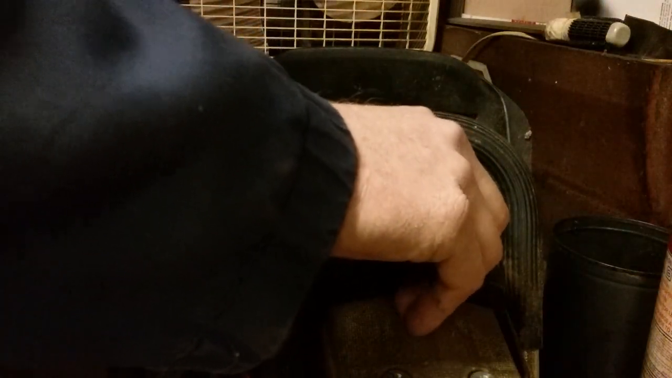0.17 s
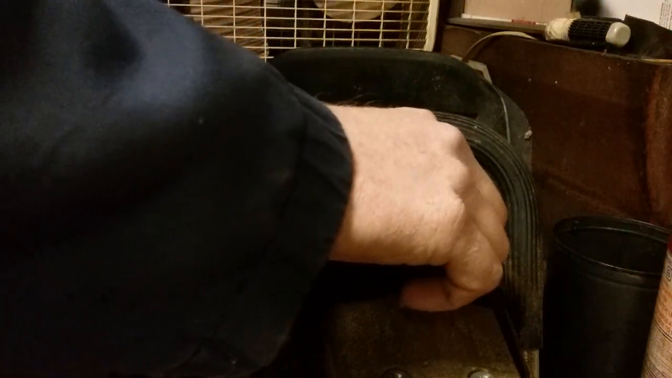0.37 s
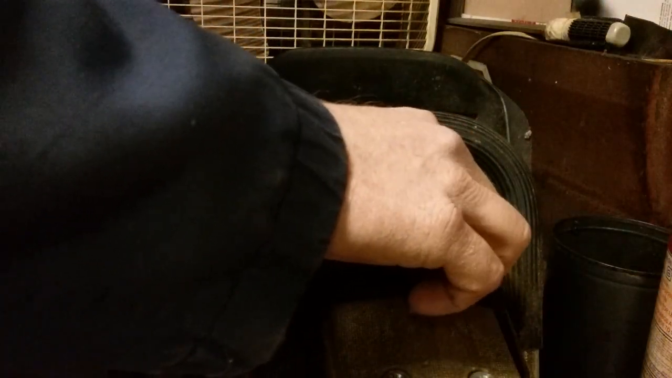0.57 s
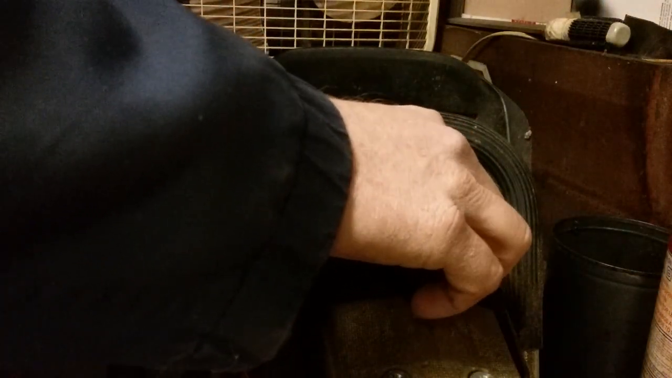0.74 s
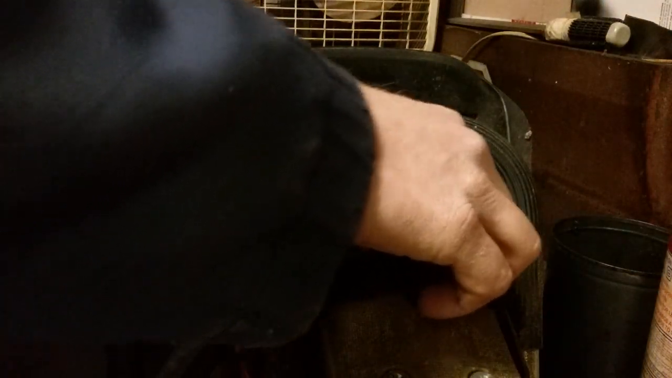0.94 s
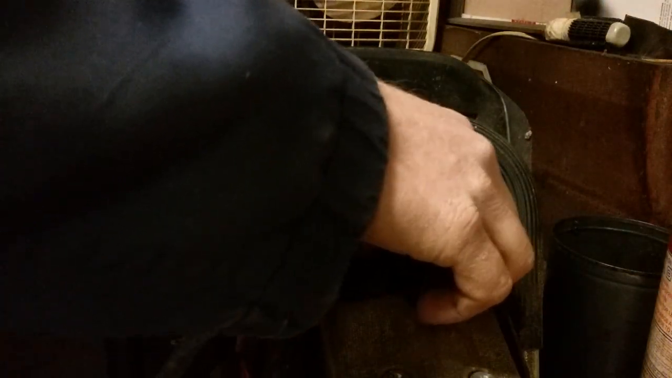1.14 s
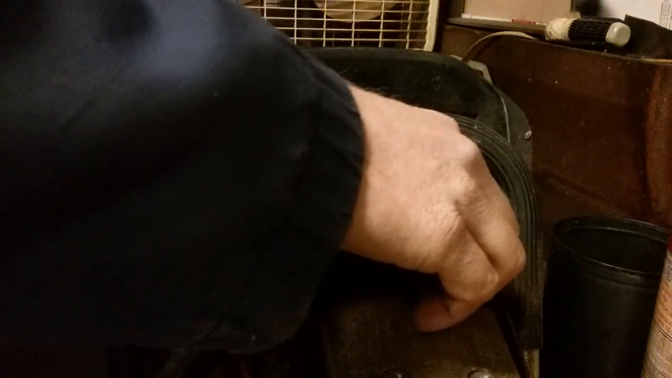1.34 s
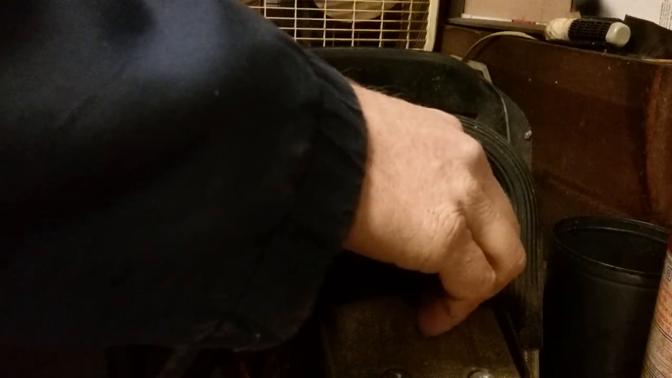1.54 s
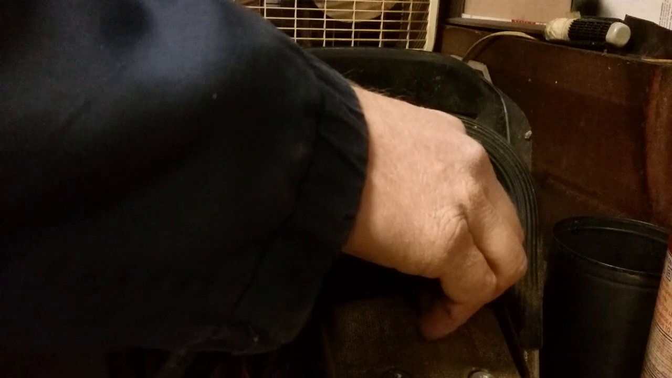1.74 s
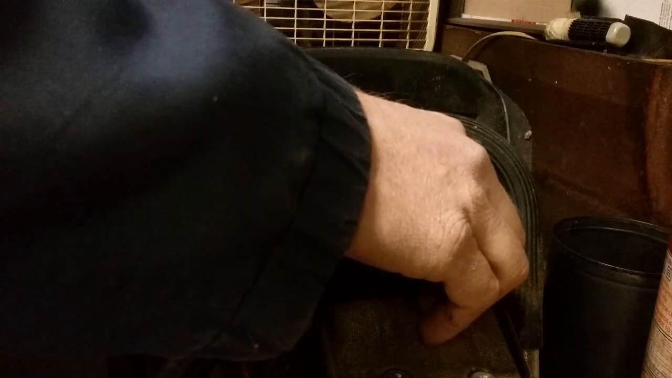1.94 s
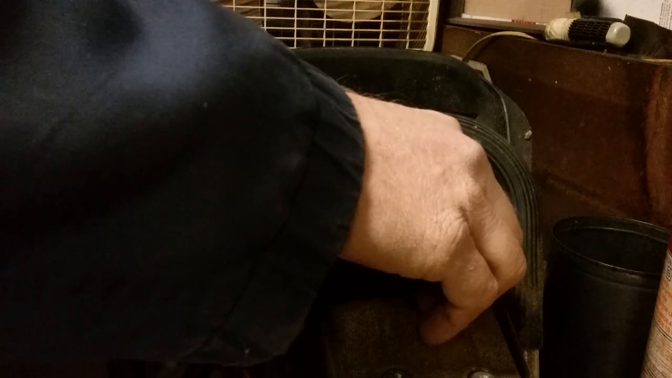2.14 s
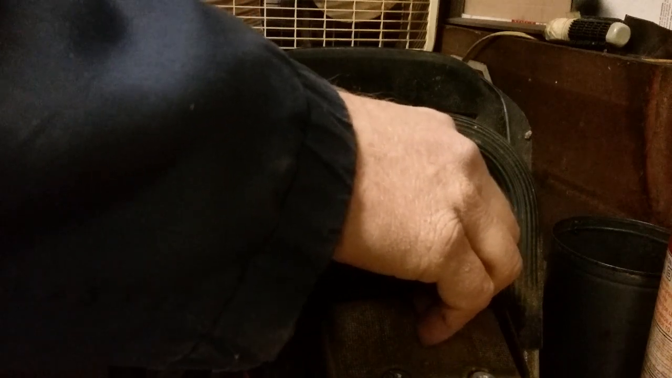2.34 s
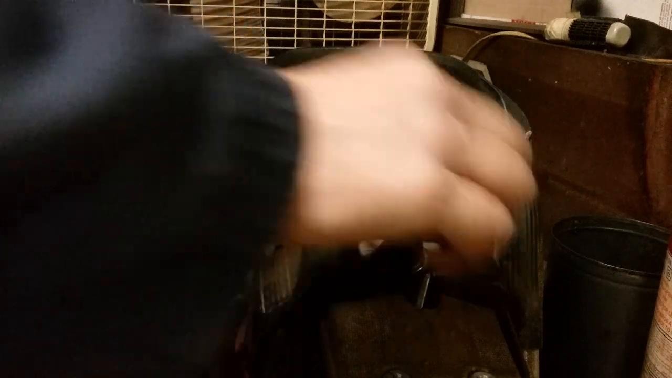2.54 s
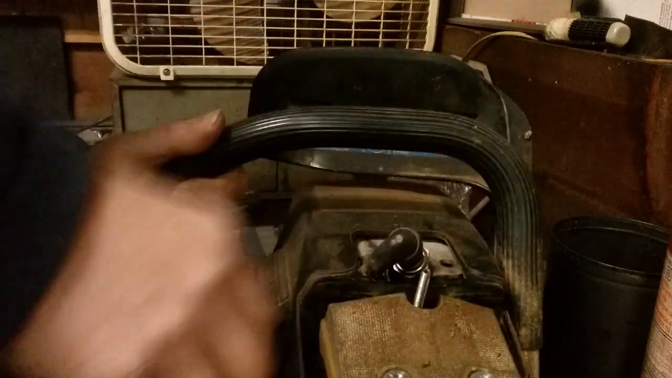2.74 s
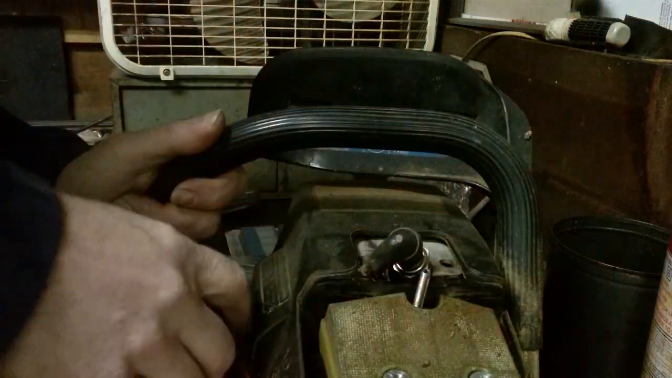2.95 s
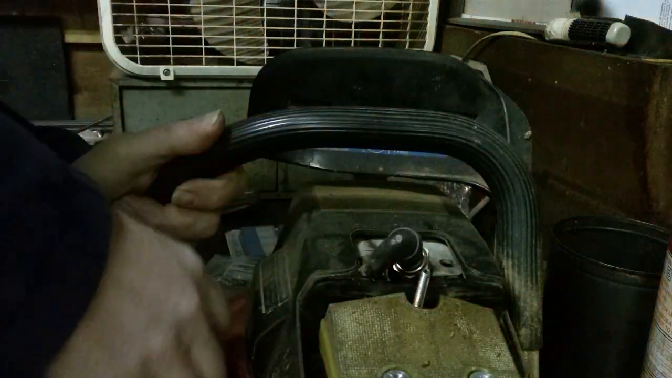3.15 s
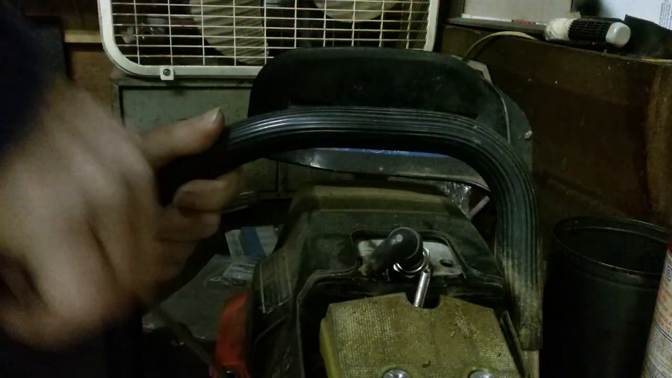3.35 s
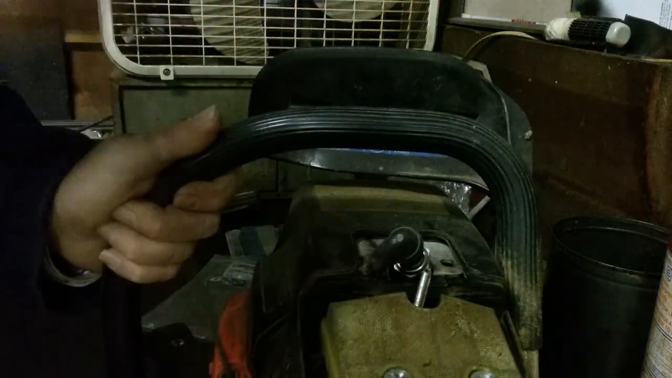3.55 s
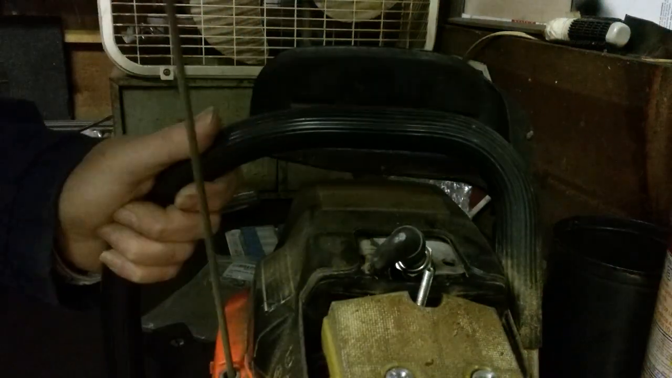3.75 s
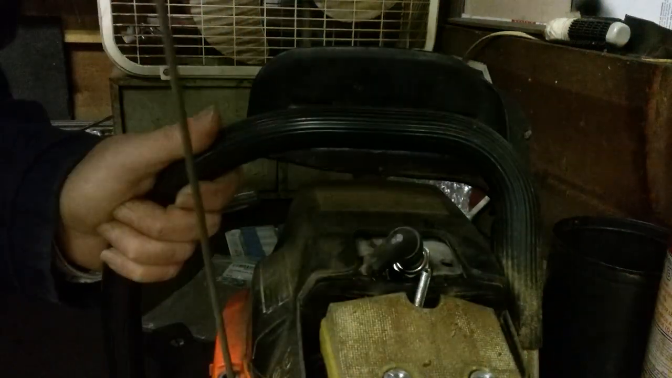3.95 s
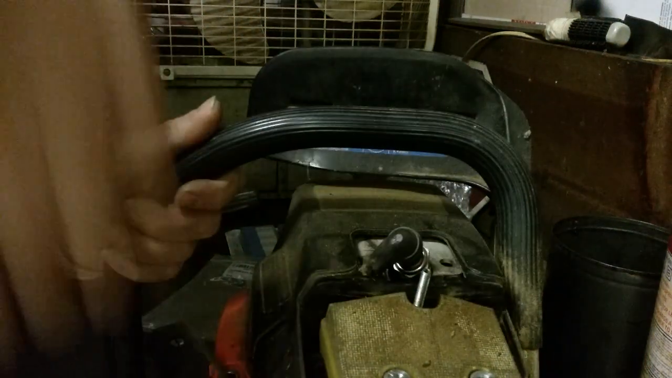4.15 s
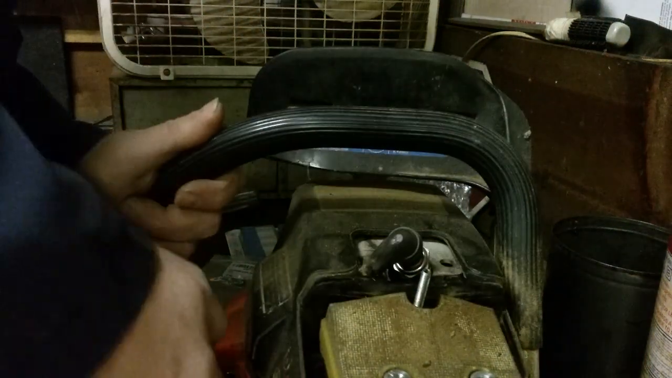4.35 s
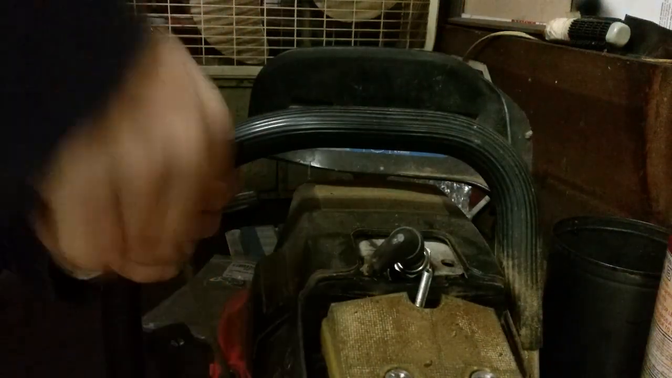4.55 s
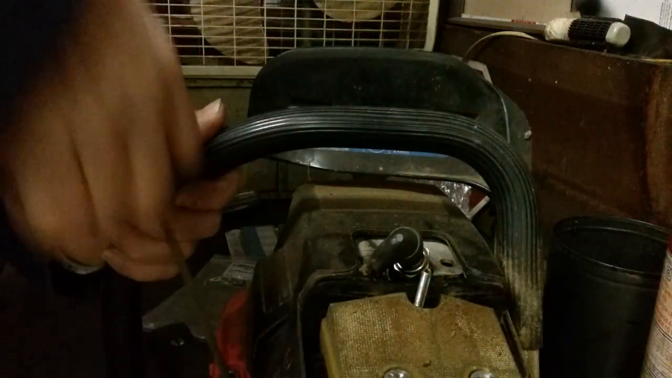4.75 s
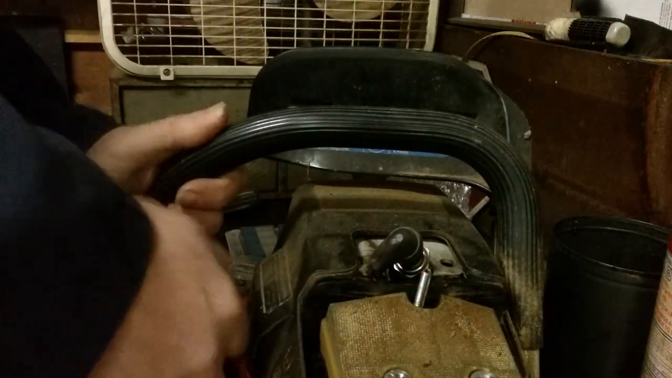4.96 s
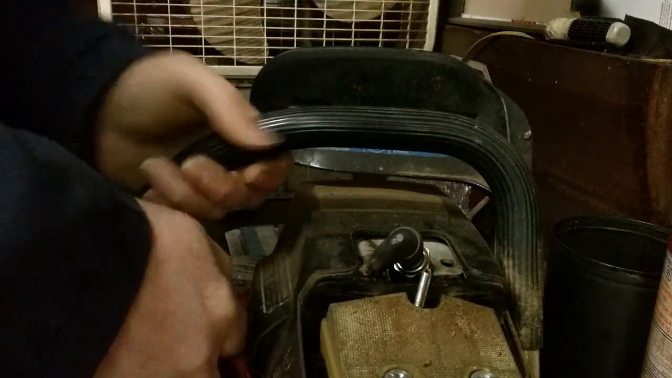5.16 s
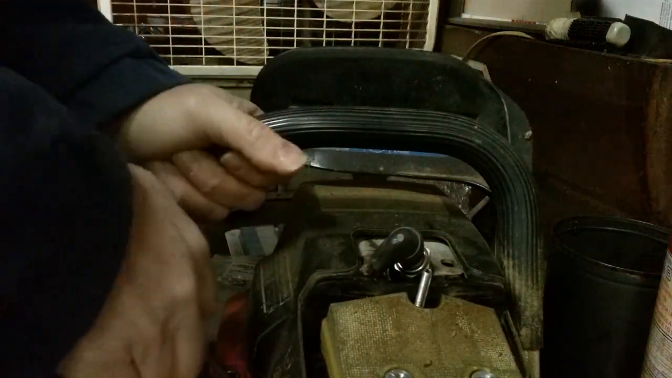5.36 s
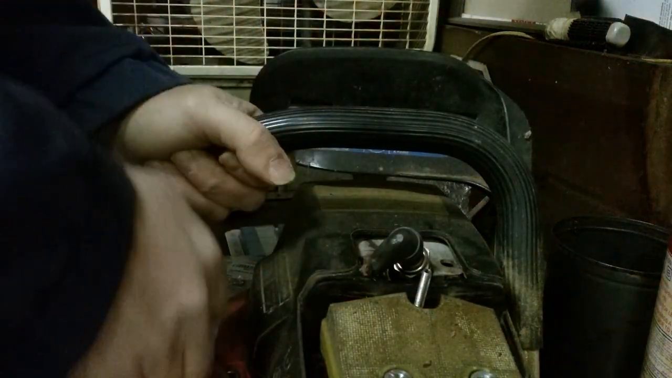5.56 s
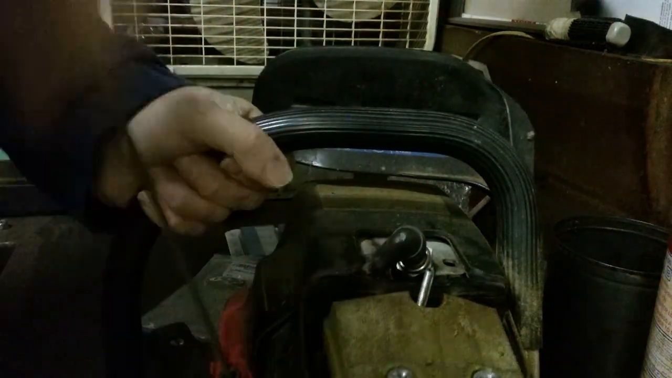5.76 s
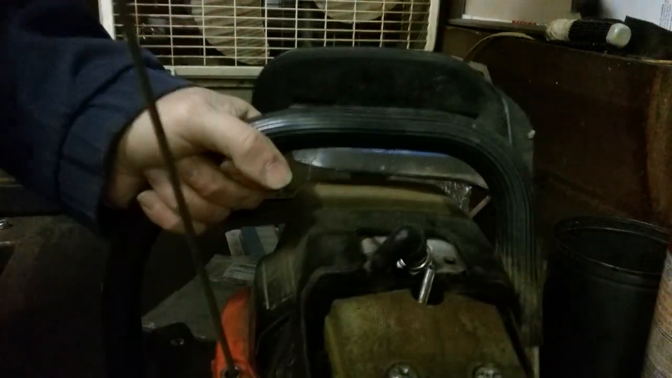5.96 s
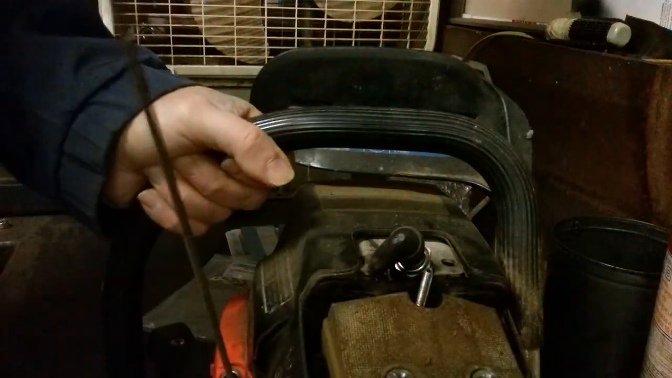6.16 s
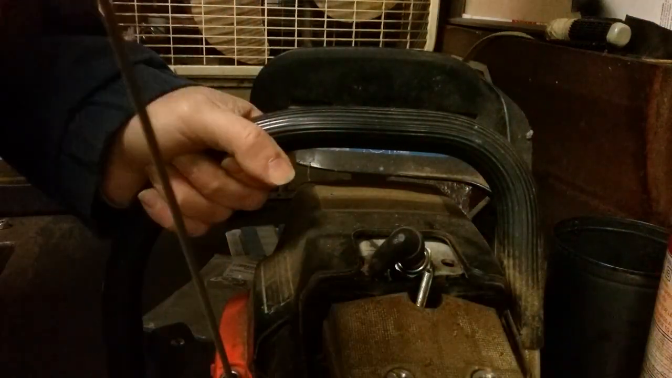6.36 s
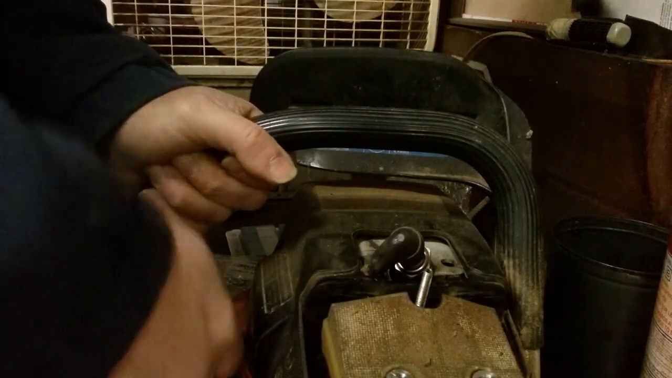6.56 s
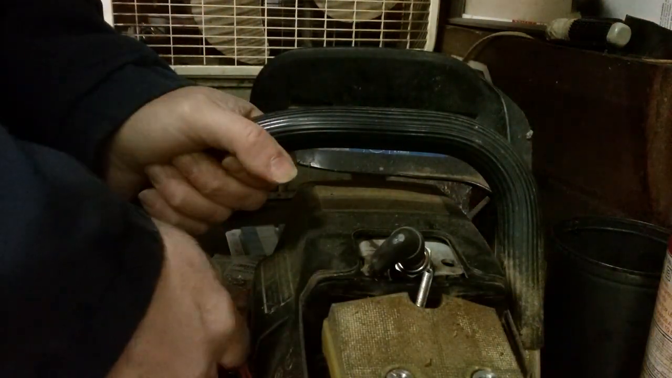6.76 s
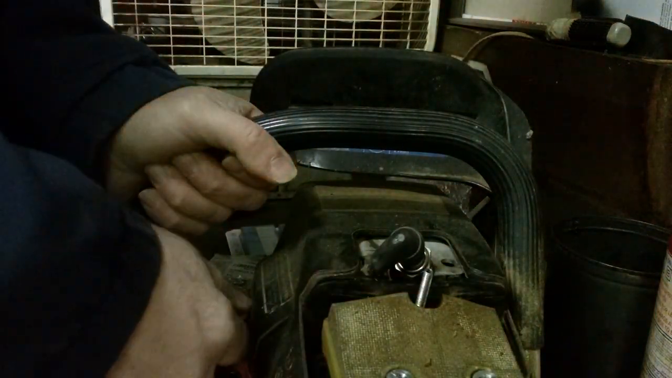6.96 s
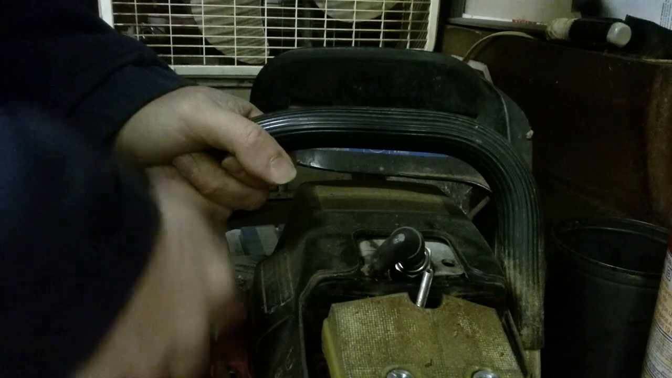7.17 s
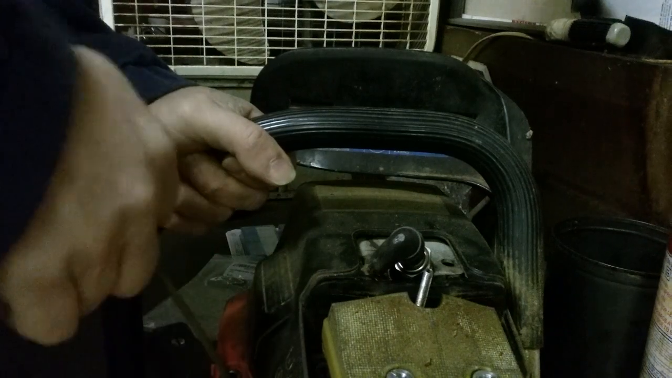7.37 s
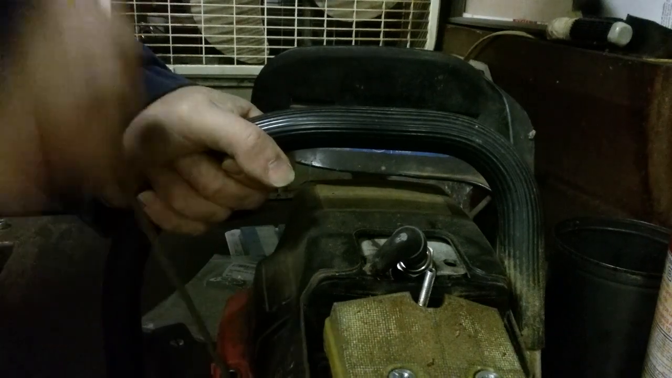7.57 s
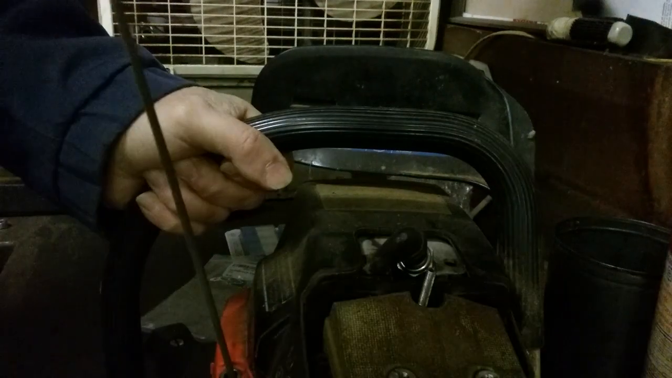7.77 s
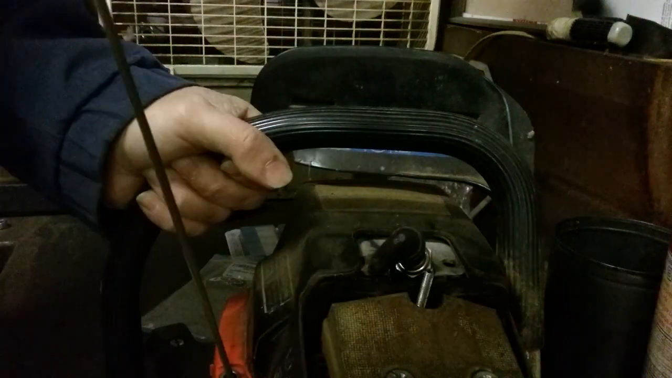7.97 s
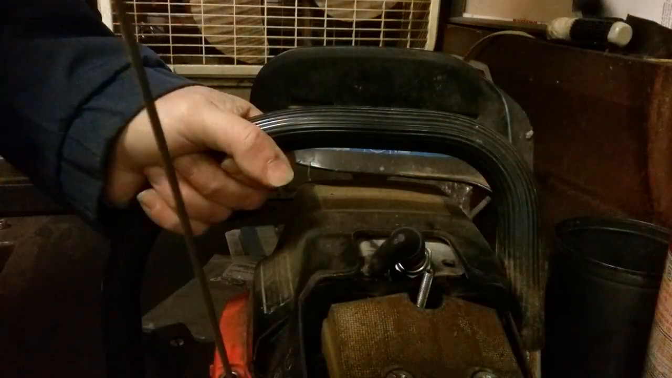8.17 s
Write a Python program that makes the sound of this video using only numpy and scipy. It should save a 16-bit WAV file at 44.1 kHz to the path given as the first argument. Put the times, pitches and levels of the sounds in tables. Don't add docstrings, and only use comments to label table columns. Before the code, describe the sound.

A chainsaw's starter rope is pulled three times in a small workshop, engine puffing and ratcheting without firing, spring rewinds clattering between knocks.

```python
import sys
import numpy as np
from scipy import signal
from scipy.fft import rfft, irfft, next_fast_len
from scipy.io import wavfile
from scipy.ndimage import uniform_filter1d

SR = 44100
rng = np.random.default_rng(int(sys.argv[2]) if len(sys.argv) > 2 else 0)


def inscribe(sig):
    pcm = np.round(np.clip(np.atleast_2d(sig).T, -1, 1) * 32767)
    wavfile.write(sys.argv[1], SR, pcm.astype(np.int16))


def elevation(decibels):
    levels = np.asarray(decibels, float)
    return 10 ** (levels / 20)


N = 362426
TIME = np.arange(N) / SR
SPREAD = 0.92

# (time [s], rasp level [dB])
PULLS = [
    [(3.6, -34.5), (3.63, -32), (3.756, -17), (3.85, -18.5), (3.92, -28), (4.0, -55), (4.04, -33)],
    [(5.77, -53), (5.795, -31), (5.848, -18), (6.05, -19), (6.13, -32), (6.162, -57), (6.21, -39)],
    [(7.62, -67), (7.64, -48), (7.742, -18.5), (7.87, -18.5), (7.994, -27.5), (8.04, -50), (8.1, -54)],
]
# (time [s], puff level [dB], click level [dB])
COMPRESSIONS = [(3.631, -8, -39), (3.771, -2.5, -34), (3.872, -4, -14.5), (5.815, -8.5, -20.5),
                (5.912, -4, -11), (5.976, -1.5, -8.5), (6.042, -0.5, -6), (6.144, -12, -18.5),
                (7.766, -2, -13.5), (7.835, -1.5, -6.5), (7.906, 0.5, -8), (8, -6.5, -10.5)]
# (time [s], peak level [dB], scrape length [s], strike on the starter cup [dB])
TURNS = [(4.048, -9.5, 0.02, -32.5), (4.090, -5.5, 0.018, -23.5), (4.127, -9.5, 0.024, -38),
         (4.167, -6.5, 0.019, -22.5), (4.211, -9.5, 0.026, -31), (4.24, -22.5, .011, -20),
         (4.264, -10, 0.027, -39), (4.307, -20.5, 0.026, -67), (6.215, -13, 0.019, -34),
         (6.245, -24.5, 0.007, -42), (6.269, -8, 0.017, -36), (6.309, -9.5, .014, -30.5),
         (6.346, -9.5, 0.024, -27.5), (6.382, -10.5, 0.024, -33.5), (6.421, -9.5, .029, -28),
         (6.473, -13, 0.024, -35.5), (6.506, -30, 0.022, -44), (6.535, -15, 0.014, -50),
         (6.555, -17.5, 0.043, -54), (8.163, -13, 0.0082, -55), (8.206, -6.5, .008, -48)]
# (time [s], peak level [dB], body [Hz], treble [dB], steel ring [dB])
KNOCKS = [(3.371, -46, 4300, 7, -29), (3.401, -7.5, 1183, -3, -14), (3.41, -19, 620, -31, -30),
          (3.595, -29, 835, -23, -30.5), (4.547, -33, 2760, -13.5, -32), (4.613, -30, 1194, 2.5, -18),
          (4.638, -4.5, 1660, -2, 0.5), (4.827, -47, 1130, -38, -33), (4.873, -39, 2640, -22.5, -16),
          (4.942, -22, 1860, -4.5, 0.5), (4.954, -24, 2320, 1.5, -12.5), (4.991, -19, 2400, 5.5, 1.5),
          (5.004, -29, 1357, 9, 10), (5.016, -18, 817, -9, -11), (5.406, -15, 1268, -1.5, -11),
          (5.418, -28, 707, -30.5, -30.5), (5.627, -43, 1610, -25.5, -25), (5.759, -10, 1540, 1, -9.5),
          (7.2, -41.5, 4000, -8, -18), (7.207, -50.5, 950, -33, -20), (7.231, -43, 934, -20, -20),
          (7.246, -45, 4050, -5, -12), (7.275, -43, 990, 16, 17), (7.355, -48.5, 3200, 11.5, -8),
          (7.4, -14, 1325, -1.5, -4), (7.592, -16, 1440, -3.5, -7)]


def unit(x):
    return x / np.sqrt(np.mean(x ** 2))


def colour(x, points):
    hz, db = np.transpose(points)
    size = next_fast_len(N + SR // 4)
    bins_hz = np.arange(size // 2 + 1) * SR / size
    gain = elevation(np.interp(np.log(bins_hz + 1), np.log(hz), db))
    return irfft(rfft(x, size) * unit(gain), size)[..., :N]


def halves(points, hz):
    low = [p for p in points if p[0] < hz / 1.1]
    high = [p for p in points if p[0] > hz * 1.1]
    db = np.interp(np.log(hz), np.log([p[0] for p in points]), [p[1] for p in points])
    low = low + [(hz, db - 3), (hz * 1.3, db - 30)]
    high = [(hz / 1.3, db - 30), (hz, db - 3)] + high
    return low, high


def curve(tables, rest=-120.):
    out = np.full(N, rest)
    for rows in map(np.array, tables):
        inside = (TIME >= rows[0, 0]) & (TIME <= rows[-1, 0])
        out[inside] = np.interp(TIME[inside], rows[:, 0], rows[:, 1])
    return out


def add(track, s, piece):
    i = int(s * SR)
    track[..., i:i + piece.shape[-1]] += piece[..., :N - i]


def pair(size):
    mid, side = rng.standard_normal((2, size))
    side = signal.lfilter(*signal.butter(2, 1200., "highpass", fs=SR), side)
    return (mid + SPREAD * side * np.array([[1], [-1]])) / np.sqrt(1 + SPREAD ** 2)


def grit(rate_hz, spread_db):
    size = int(SR / rate_hz)
    steps = np.minimum(rng.exponential(size=N // size + 1), 3)
    level = uniform_filter1d(np.repeat(steps, size)[:N], size)
    return unit(elevation(spread_db * level) * pair(N))


def ring(x, modes):
    out, first = np.zeros_like(x), np.argmax(x[0] != 0)
    for hz, db, t60 in modes:
        r = np.exp(-np.log(1000) / (t60 * SR))
        poles = [1, -2 * r * np.cos(2 * np.pi * hz / SR), r * r]
        out[:, first:] += elevation(db) * np.sqrt(1 - r * r) * signal.lfilter([1, 0, -1], poles, x[:, first:])
    return out


def shop():
    # (frequency [Hz], level [dB per Hz])
    air_spectrum = [(24, -40), (50, -13), (124, -10.5), (402, -20.5), (444, -23.5), (479, -11.5),
                    (542, -28), (585, -13), (646, -18.5), (697, -18.5), (1630, -18.5), (3140, -25.5),
                    (16000, -32)]
    # (frequency [Hz], level [dB])
    hum_tones = [(119., -78), (1680., -82.5)]
    mid, side = (colour(rng.standard_normal(N), air_spectrum) for _ in range(2))
    side = signal.sosfilt(signal.butter(1, 500., "highpass", fs=SR, output="sos"), side)
    hum = sum(elevation(db) * np.sin(2 * np.pi * hz * TIME) for hz, db in hum_tones)
    return elevation(-69.5) * (mid + side * np.array([[1], [-1]])) + hum


def room(x):
    t60_s, treble_t60_s, room_db = 0.33, 0.32, -11
    t = np.arange(int(.6 * SR)) / SR
    split = signal.butter(2, 4500., fs=SR, output="sos")
    bass = signal.butter(2, 650., fs=SR, output="sos")
    shared, noise = rng.standard_normal(len(t)), rng.standard_normal((2, len(t)))
    noise = noise + signal.sosfiltfilt(bass, shared - noise)
    low = signal.sosfiltfilt(split, noise)
    tail = low * 1000 ** (-t / t60_s) + elevation(-2.0) * (noise - low) * 1000 ** (-t / treble_t60_s)
    tail = tail * np.minimum(t / 0.00025, 1)
    return elevation(room_db) * signal.fftconvolve(x[:1], tail / np.sqrt(np.sum(tail[0] ** 2)), axes=1)[:, :N]


def microphones(x):
    lag_s, left_treble_db = .00014, 4.2
    size = next_fast_len(N + SR // 4)
    hz = np.arange(size // 2 + 1) * SR / size
    tilt_db = left_treble_db / 2 * np.clip(np.log2(hz / 2800. + 1e-9), -.15, 1)
    late = np.exp(-2j * np.pi * hz * lag_s)
    return irfft(rfft(x, size) * np.array([elevation(tilt_db), elevation(-tilt_db) * late]), size)[:, :N]


def bench(saw, linger_s):
    # (frequency [Hz], level [dB])
    rumble_spectrum = [(30, -24.5), (70, 3.5), (130, -3), (300, -12), (450, -27), (1500, -62)]
    keep = np.exp(-1 / (linger_s * SR))
    power = signal.lfilter([(1 - keep) ** 2], [1, -2 * keep, keep ** 2], saw[0] ** 2)
    shake = np.sqrt(power + 1e-12)
    return elevation(-28) * colour(shake * rng.standard_normal(N), rumble_spectrum)


def brushing():
    # (start [s], end [s], level at the end [dB])
    rustles = [(0.26, 0.446, -64.5), (0.424, 0.588, -66.5), (3.25, 3.399, -55.5), (3.348, 3.601, -46),
               (4.691, 4.847, -49.5), (4.853, 4.95, -47.5), (5.347, 5.41, -59), (5.683, 5.766, -57.5),
               (7.218, 7.39, -50.5), (3.998, 4.027, -46.5), (8.057, 8.161, -44.5)]
    swell_db_s = 58
    swell = np.zeros(N)
    for start, end, db in rustles:
        swell += (TIME >= start) * (TIME < end) * elevation(db - swell_db_s * np.abs(end - TIME))
    cloth = [(200, -22.5), (400, -10.0), (800, 5.5), (3000, -1.5), (5000, -5.5), (7000, -23.5)]
    return swell * colour(grit(100, 2.4), cloth)


def squeaks():
    # (start [s], length [s], from [Hz], to [Hz], level [dB])
    slides = [
        (0.163, .04, 4150, 4270, -63),
        (1.252, .03, 4450, 4500, -63),
        (6.602, 0.081, 1050, 1183, -45.5),
        (6.597, 0.063, 4920, 4670, -38.5),
        (6.635, .045, 12900, 11500, -55),
        (8.135, 0.032, 2320, 2640, -36),
    ]
    out = np.zeros(N)
    for s, length, from_hz, to_hz, db in slides:
        u = np.linspace(0, 1, int(length * SR))
        flutter = elevation(4. * np.interp(u, np.linspace(0, 1, 9), rng.standard_normal(9)))
        phase = 2 * np.pi * np.cumsum(from_hz + (to_hz - from_hz) * u) / SR
        add(out, s, elevation(db) * np.sin(np.pi * u) * flutter * np.sin(phase))
    return out


def knocks():
    # (time [s], peak level [dB], body [Hz])
    tick_rows = [(3.611, -22, 4350), (3.752, -13.5, 4500), (3.657, -15, 3040), (3.695, -14.5, 3060),
                 (3.7243, -15, 4170), (3.7374, -19, 4500), (3.7968, -28, 4280), (3.8425, -7.5, 4100),
                 (3.921, -17.5, 3815), (5.8383, -16.5, 3144), (5.911, -9.5, 4040), (5.9894, -15, 3120),
                 (6.0663, -23, 4260), (6.1082, -20, 4235), (7.684, -15.5, 2700), (7.7176, -18, 4100),
                 (7.768, -12, 4040), (7.85, -17.5, 4280), (7.9277, -19.5, 3870), (8.0475, -13, 3520)]
    # (time [s], peak level [dB], body [Hz])
    tap_rows = [(.107, -40.5, 1100), (1.108, -46, 1020), (1.25, -55, 1160), (1.73, -55, 608),
                (1.869, -46, 745), (2.151, -36.5, 1090), (2.160, -19.5, 1380), (2.172, -45, 2210),
                (2.207, -43, 2200), (2.219, -44, 3860), (2.561, -54, 918), (7.007, -40, 950),
                (6.76, -46.5, 300)]
    # (time [s], peak level [dB], body [Hz])
    creak_rows = [(0.292, -42.5, 1790), (0.337, -44, 2070), (0.362, -54, 700), (.395, -54, 1070),
                  (0.438, -48, 720), (.463, -47, 700), (.499, -47.5, 700), (.543, -46.5, 715),
                  (2.835, -47.5, 980), (2.906, -47, 1620), (2.93, -51, 960)]
    click_lead_s, click_hz = 0.014, 4500
    # (time, peak dB, body Hz, treble dB, steel ring dB)
    ticks = [(*row, -29, -42) for row in tick_rows]
    clicks = [(s - click_lead_s, db, click_hz, -29.5, -42) for s, _, db in COMPRESSIONS]
    taps = [(*row, -40, -40) for row in tap_rows]
    creaks = [(*row, -40, -40) for row in creak_rows]
    # (rows, casing dB, rise s, t60 s, thud dB, snaps like metal, touches the shell)
    kinds = [(KNOCKS, 0., .002, 0.092, -30, False, False),
             (ticks, -2., .001, 0.042, -30, True, False),
             (clicks, -4., .001, 0.016, -30, True, False),
             (taps, -8., .002, 0.067, -17.5, False, True),
             (creaks, 3., .002, 0.06, -5, False, False)]
    out, wide, crack, drive, thud, snap, shell = np.zeros((7, 2, N))
    t = np.arange(int(.2 * SR)) / SR
    for rows, casing_db, rise, t60, thud_db, snaps, touches in kinds:
        for s, db, hz, treble_db, ring_db in rows:
            shape = np.minimum(t / rise, 1) * np.exp(-np.log(1000) * t / t60)
            blow = elevation(db - 10.0) * shape * pair(len(t))
            body = signal.butter(2, [hz / 1.6, hz * 1.6], "bandpass", fs=SR, output="sos")
            add(out, s, signal.sosfilt(body, blow) * np.sqrt(SR / 2 / hz))
            add(wide, s, elevation(casing_db) * blow)
            add(crack, s, elevation(treble_db) * blow * np.exp(-t / 0.004))
            add(drive, s, elevation(ring_db) * blow)
            add(thud, s, elevation(thud_db) * blow)
            if touches:
                add(shell, s, blow * np.exp(-t / .02))
            if snaps:
                add(snap, s, elevation(-20.5) * blow * np.exp(-t / 0.0032))
    out += colour(wide, [(100, -27.5), (200, -20.5), (400, -17.5), (560, 2.5), (2300, -3.0), (4500, -2.0),
                         (6500, -50.5)])
    out += colour(snap, [(7000, -33.0), (9500, -3.5), (16000, 7)])
    out += colour(thud, [(170, -31.0), (320, 2.5), (520, -11.0), (1500, -42.5)])
    out += colour(crack, [(4000, -15.0), (5200, 1.5), (8000, -8.0), (14000, -17), (15500, -34.5)])
    return out, drive, shell


def cup():
    # (frequency [Hz], level [dB], t60 [s])
    cup_modes = [(3232, -8., .09), (3261, -1., .2), (3296, -14., .12)]
    # (time [s], level [dB])
    brushes = [
        (6.252, -26),
        (6.3, -33),
        (6.332, -32),
        (6.376, -26),
        (6.462, -26.5),
        (6.511, -38.5),
        (4.886, -53),
        (7.441, -51),
    ]
    strike_lag_s, knock_strike_db = 0.011, -22.5
    mute, mute_s = .65, .009
    drive = np.zeros((2, N))
    push_t = np.arange(int(.004 * SR)) / SR
    push = np.hanning(len(push_t)) * np.cos(2 * np.pi * cup_modes[1][0] * push_t)
    hits = [(s + strike_lag_s, db) for s, _, _, db in TURNS]
    hits += [(s, db + ring_db + knock_strike_db) for s, db, _, _, ring_db in KNOCKS]
    hits += list(brushes)
    for (s, db), side in zip(hits, rng.uniform(.6, 1.4, len(hits))):
        add(drive, s, elevation(db + 6.5) * push * np.array([[side], [1 / side]]))
    rubs, t = np.zeros(N), np.arange(-3 * mute_s, 3 * mute_s, 1 / SR)
    for row in TURNS:
        add(rubs, row[0] + t[0], np.log(1 - mute * np.exp(-(t / mute_s) ** 2)))
    return np.exp(rubs) * ring(drive, cup_modes)


def flicks():
    # (time [s], level [dB])
    scratches = [
        (4.052, -25),
        (6.216, -21),
        (6.43, -24.5),
        (6.535, -29),
        (6.579, -31.5),
        (8.046, -44),
        (7.398, -36),
        (8.164, -38),
        (8.192, -16),
    ]
    # (frequency [Hz], level [dB], t60 [s])
    coil_modes = [(5840, -9, .12), (6745, -14, 0.13), (7340, -21.5, .08), (10900, -20.5, 0.073),
                  (14110, -30, .06)]
    drive = np.zeros((2, N))
    t = np.arange(int(.03 * SR)) / SR
    for s, db in scratches:
        add(drive, s, elevation(db) * np.exp(-t / 0.0053) * pair(len(t)))
    return ring(drive, coil_modes)


def rewind():
    # (start [s], spring slackens [s], level [dB])
    rattles = [
        (4.045, 4.23, -28.5),
        (6.22, 6.46, -28.5),
        (8.168, 8.3, -30),
    ]
    # (frequency [Hz], level [dB per Hz])
    housing_spectrum = [(120, -54.5), (200, -27.5), (448, -18.5), (491, -8.5), (601, -1.5), (749, -15),
                        (933, -4), (2050, -10), (2960, -8), (3250, -4.5), (3560, -4.5), (6640, -12.5),
                        (8740, -41.5), (14300, -39), (15000, -56.5), (16000, -71)]
    rattle_fade_db_s = 183
    scrape, treble, drive, rattle = np.zeros((4, N))
    t = np.arange(int(.15 * SR)) / SR
    for s, db, hold, _ in TURNS:
        fall = np.exp(-np.maximum(t - hold, 0) / .004 - t / .06)
        shape = elevation(db - 7.) * np.minimum(t / .003, 1) * fall
        add(scrape, s, shape)
        add(treble, s, shape * elevation(-0.5 + 0.4 * db) * np.exp(-t / .03))
        add(drive, s, shape * elevation(-1.5))
    for start, slack, db in rattles:
        rattle += (TIME >= start) * elevation(db - 3.5 - rattle_fade_db_s * np.maximum(TIME - slack, 0))
    low, high = halves(housing_spectrum, 2700)
    dull, bright = grit(500, 2), grit(600, 2)
    body = colour((scrape + rattle) * dull, low)
    body = body + elevation(-4.5) * colour((treble + elevation(6.5) * rattle) * bright, high)
    return body, (drive + elevation(-20.5) * rattle) * grit(120, 6.3)


def pings():
    # (time [s], peak level [dB], pitch [Hz])
    pawl_snaps = [(3.6593, -22, 3160), (3.7264, -17, 4170), (3.752, -14.5, 4270), (3.8468, -6.5, 4050),
                  (3.8583, -9.5, 3200), (5.8512, -18.5, 3320), (5.8955, -21, 3880), (5.909, -5, 4040),
                  (5.932, -12.5, 4300), (5.9608, -11.5, 4900), (6.0255, -11.5, 4970), (6.0651, -24, 4350),
                  (6.0774, -29.5, 3330), (6.1095, -25.5, 4190), (6.1255, -22, 4850), (7.6868, -19, 3100),
                  (7.7189, -26.5, 4020), (7.7356, -20.5, 2640), (7.818, -32, 3820), (7.8545, -24, 4290),
                  (7.871, -15, 2600), (7.8895, -28, 3790), (7.9264, -8.5, 4080), (7.9843, -20, 4790),
                  (8.0492, -20.5, 4530)]
    # (time [s], peak level [dB], pitch [Hz])
    crank_clunks = [(3.611, -20, 1013), (3.659, -16, 1750), (3.7239, -13, 944), (3.7994, -31, 1390),
                    (3.8284, -11, 1648), (3.843, -8, 1410), (5.8674, -18, 980), (5.908, -8, 1400),
                    (5.9749, -10.5, 1053), (6.077, -20.5, 1430), (7.688, -27, 980), (7.7374, -27, 890),
                    (7.777, -17, 1550), (7.797, -19, 1390), (7.87, -16, 940), (7.9231, -11.5, 963)]
    out = np.zeros(N)
    t = np.arange(int(.06 * SR)) / SR
    for rows, gain_db, t60 in ((pawl_snaps, -0.5, 0.038), (crank_clunks, -3.5, .05)):
        for s, db, hz in rows:
            neighbour_hz = hz * rng.uniform(.8, 1.25)
            tone = np.sin(2 * np.pi * hz * t) + .45 * np.sin(2 * np.pi * neighbour_hz * t)
            add(out, s, elevation(db + gain_db) * np.minimum(t / 0.00081, 1) * 1000 ** (-t / t60) * tone)
    return out


def whistle():
    # (top of stroke [s], length [s], level [dB])
    breaths = [(3.625, 0.031, -40), (3.77, 0.034, -24.5), (3.853, 0.038, -39), (3.938, 0.034, -29.5),
               (5.899, 0.025, -27.5), (5.971, 0.029, -19.5), (6.036, 0.038, -22), (6.068, 0.018, -26),
               (6.145, 0.047, -24.5), (7.697, .035, -37.5), (7.757, 0.028, -29), (7.837, 0.029, -19.5),
               (7.898, 0.027, -22.5), (7.997, 0.033, -24)]
    from_hz, to_hz, waver_share = 590, 1030, .07
    second_ratio, second_db, flutter_db = 1.8, -11.5, 5.5
    out = np.zeros(N)
    for s, length, db in breaths:
        u = np.linspace(0, 1, int(length * SR))
        knots = np.linspace(0, 1, 7)
        first, second, waver = (np.interp(u, knots, row) for row in rng.standard_normal((3, 7)))
        pitch = from_hz * (to_hz / from_hz) ** u * (1 + waver_share * waver)
        phase = 2 * np.pi * np.cumsum(pitch) / SR
        tone = elevation(flutter_db * first) * np.sin(phase)
        tone += elevation(second_db + flutter_db * second) * np.sin(second_ratio * phase)
        add(out, s - length, elevation(db) * np.sin(np.pi * u) * tone)
    return out


def effort():
    stall_db, lag_s, stall_s = -12, 0.0012, 0.0055
    stalls = sum(np.exp(-((TIME - s - lag_s) / stall_s) ** 2) for s, _, _ in COMPRESSIONS)
    return curve(PULLS) + stall_db * stalls


def chatter(split_hz):
    rings_per_s = 1200
    out = np.zeros((2, 2, N))
    for rows in PULLS:
        start, length = rows[0][0], rows[-1][0] - rows[0][0]
        for when, pitch, glide, size, turn in rng.random((int(length * rings_per_s), 5)):
            hz = 480 * 12 ** pitch ** .75
            cycles = np.arange(int(24 * SR / hz)) * hz / SR
            level = (hz / 1000) ** .8 * elevation(-3.5 * np.log(1.04 - size))
            shape = np.minimum(cycles, 1) * np.exp(-cycles / 5) * level
            between_mics = np.array([[0], [SPREAD * hz / 800 * (turn - .5)]])
            phase = 2 * np.pi * cycles * (1 + .02 * (glide - .5) * cycles) + between_mics
            add(out[int(hz > split_hz)], start + when * length, shape * np.sin(phase))
    return out / 6.3


def works():
    # (frequency [Hz], level [dB per Hz])
    rasp_spectrum = [(350, -17.), (500, -3.), (620, 0.), (900, 0.), (1400, -1.), (2000, -3.), (2800, -5.),
                     (4300, -5.), (5200, -10.), (6200, -22.), (8000, -30.), (10500, -33.), (13000, -35.),
                     (16000, -38.)]
    full_db, lurch_db, lurch_size = -17, 2.5, 500
    low, high = halves([(20, 0), (22000, 0)], 2500)
    low_parts, high_parts = chatter(2500)
    rasp = low_parts + elevation(-9.) * colour(grit(200, 4), low)
    hiss = high_parts + elevation(-3.) * colour(grit(200, 3), high)
    lurch = np.interp(TIME, TIME[::lurch_size], rng.standard_normal(N // lurch_size + 1))
    db = effort() + lurch_db * lurch
    hiss_db = 1 + 0.14 * (db - full_db)
    return elevation(db - 3.5) * colour(rasp + elevation(hiss_db) * hiss, rasp_spectrum)


def piston():
    # (frequency [Hz], level [dB], t60 [s], lag [s])
    air_modes = [(62, -33., .12, .002), (119, -7.5, .1, .0012), (186, -7., .065, 0.), (245, -19., .04, 0.),
                 (315, -8.5, .055, 0.)]
    # (time [s], puff level [dB])
    returns = [(3.679, -31.5), (3.706, -8), (3.744, -17.5), (3.796, -16), (3.806, -11), (3.829, -14.5),
               (3.899, -24), (3.942, -17), (5.868, -9), (5.942, -8.5), (6.003, -9.5), (6.072, -6.5),
               (6.115, -11.5), (7.702, -16), (7.793, -6), (7.866, -9), (7.934, -2.5), (7.964, -33)]
    rise_s, lead_s = .007, .03
    sharp_stroke, dull_stroke = 0.9, 0.14
    out = np.zeros(N)
    t = np.arange(int(.2 * SR)) / SR - lead_s
    strokes = [(s, db, sharp_stroke) for s, db, _ in COMPRESSIONS]
    strokes += [(s, db, dull_stroke) for s, db in returns]
    drift = rng.standard_normal((len(strokes), len(air_modes)))
    for (s, db, sharp), shifts in zip(strokes, drift):
        for k, (hz, mode_db, t60, lag) in enumerate(air_modes):
            shape = np.where(t < 0, np.exp(-(t / rise_s) ** 2 / 2), np.exp(-np.log(1000) * t / t60))
            pitch = hz * (1 + (.08 - .065 * sharp) * shifts[k])
            level = elevation(db + mode_db) * sharp ** (max(k - 1, 0) / 1.2)
            add(out, s - lead_s, level * shape * np.cos(2 * np.pi * pitch * (t - lag)))
    gust = colour(rng.standard_normal(N), [(30, -37.0), (60, -7.0), (120, -3.5), (320, -5.0), (420, -31.0),
                                           (1500, -74.0)])
    return out + elevation(effort() - 11.0) * gust


def scene():
    # (frequency [Hz], level [dB], t60 [s])
    spring_modes = [(643, -23.5, 0.17), (1440, -24, 0.03), (1655, -12.5, 0.018), (2030, -15, 0.023),
                    (4050, -17.5, 0.089), (4040, -13, 0.013), (4600, -15.5, 0.044), (5650, -20.5, 0.097),
                    (5920, -24, 0.1), (6360, -22.5, 0.13), (6750, -21.5, 0.13), (7530, -26.5, .05),
                    (7980, -32, 0.19), (9100, -35.5, .06), (9460, -33, 0.032), (10420, -27, 0.048),
                    (12580, -27.5, .07), (13200, -26.5, .07), (13400, -31, .07), (14110, -26.5, .06),
                    (14570, -34.5, 0.072), (15100, -38, .06)]
    # (frequency [Hz], level [dB], t60 [s])
    steel_modes = [(1540, -21.5, .09), (1954, -23, 0.059), (2070, -23.5, 0.065), (4200, -18.5, 0.028),
                   (5650, -22, 0.07), (5995, -19, 0.09), (6650, -22.5, .09), (7670, -25.5, .06),
                   (10200, -33.5, .04), (14100, -33, .05)]
    # (frequency [Hz], level [dB], t60 [s])
    shell_modes = [(1120, -9, 0.059), (1620, -33.5, 0.054), (2158, -12.5, .08), (2266, -9, 0.1),
                   (3790, -20.5, 0.066), (4270, -25.5, 0.068)]
    housing, spring_drive = rewind()
    blows, blow_drive, tap_drive = knocks()
    rings = ring(spring_drive, spring_modes) + ring(blow_drive, steel_modes) + flicks()
    rings = signal.sosfilt(signal.butter(6, 14900, fs=SR, output="sos"), rings)
    saw = works() + whistle() + pings() + housing + blows + ring(tap_drive, shell_modes) + brushing()
    air, starter_cup = piston(), cup()
    wet = room(saw + elevation(2) * rings + elevation(-10.0) * starter_cup + elevation(2.5) * air)
    rumble = bench(housing, 0.027) + elevation(-1.0) * bench(blows, 0.0093)
    direct = saw + rings + starter_cup + air + squeaks() + rumble
    return microphones(direct) + wet + shop()


def top_cut(x):
    return signal.sosfilt(signal.butter(12, 16150, fs=SR, output="sos"), x)


def record(dry):
    ceiling, offset = .92, -0.00045
    top = signal.ellip(8, .2, 60, 15950, fs=SR, output="sos")
    clipped = np.clip(dry, -ceiling, ceiling) + offset
    return top_cut(signal.sosfilt(top, clipped))


dry = scene()
out = record(dry)
inscribe(out)
```